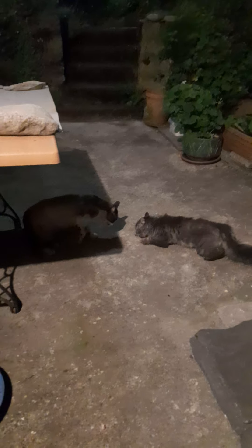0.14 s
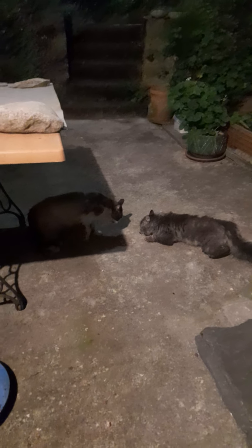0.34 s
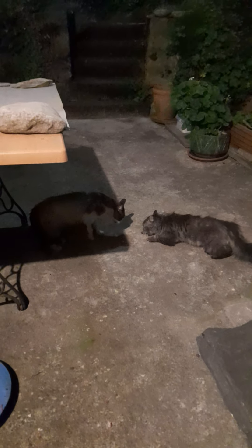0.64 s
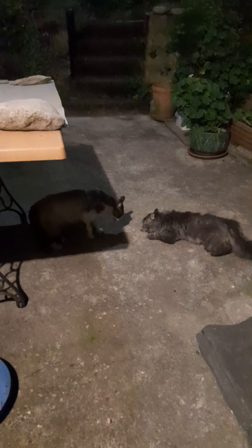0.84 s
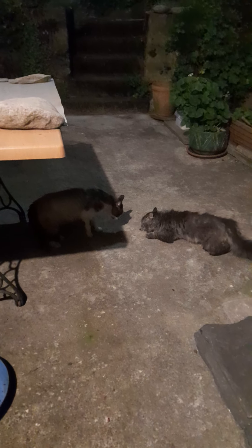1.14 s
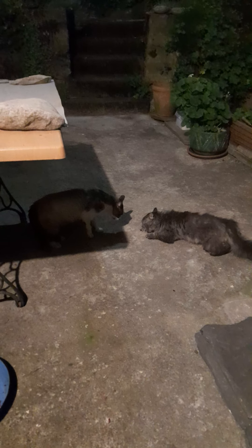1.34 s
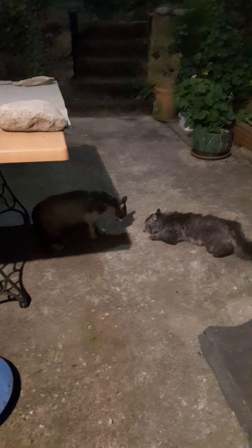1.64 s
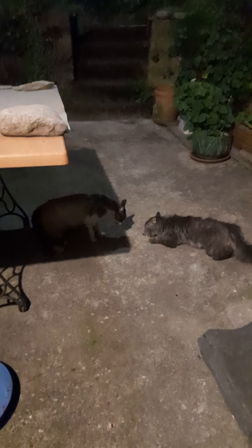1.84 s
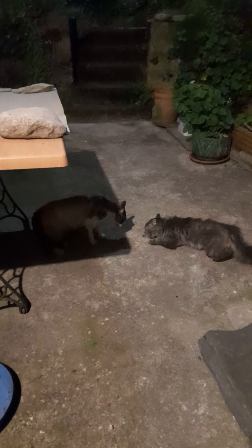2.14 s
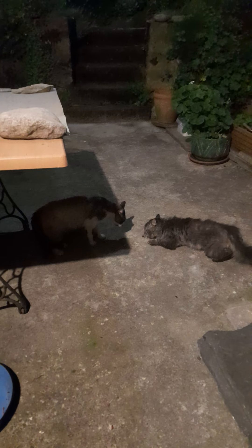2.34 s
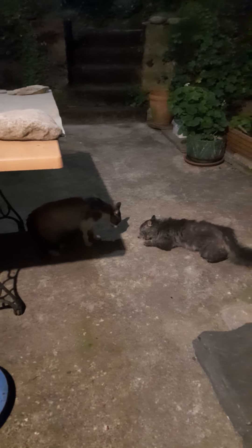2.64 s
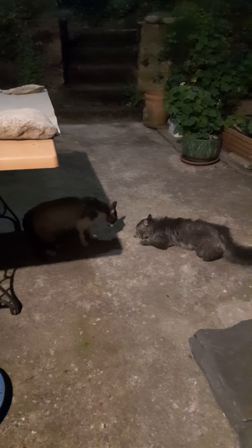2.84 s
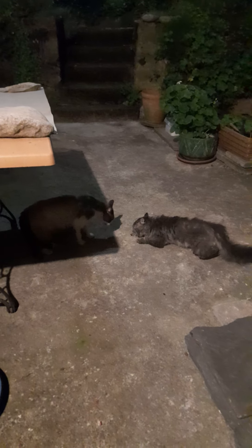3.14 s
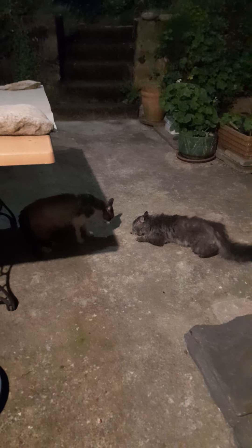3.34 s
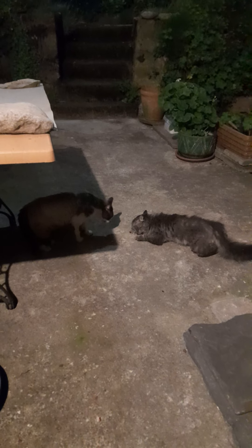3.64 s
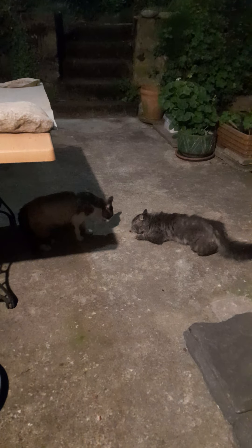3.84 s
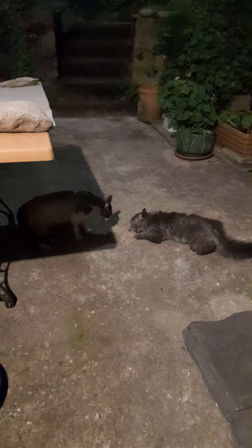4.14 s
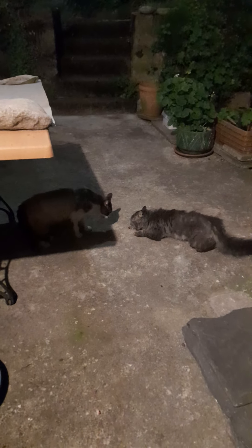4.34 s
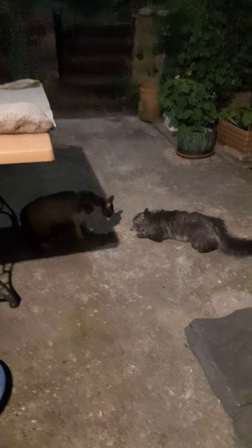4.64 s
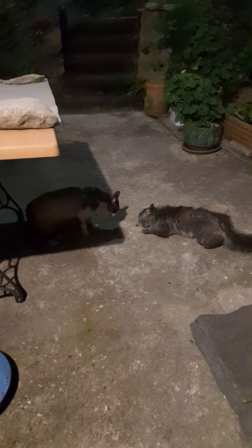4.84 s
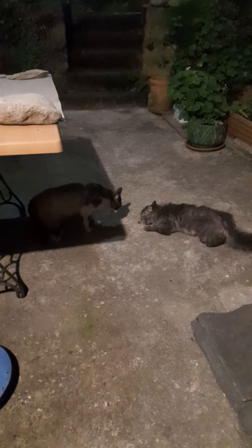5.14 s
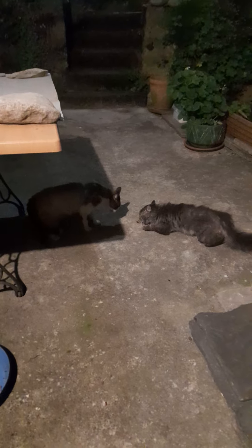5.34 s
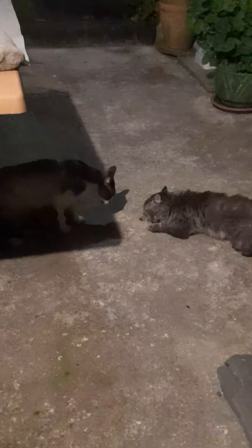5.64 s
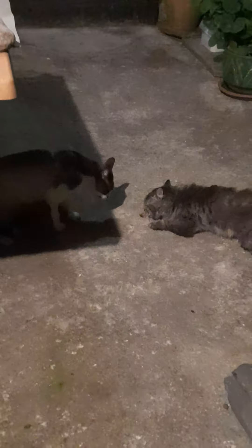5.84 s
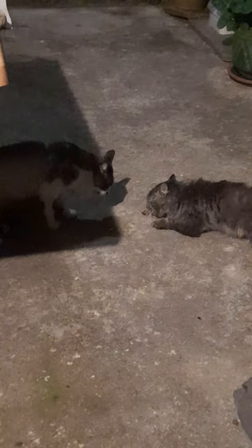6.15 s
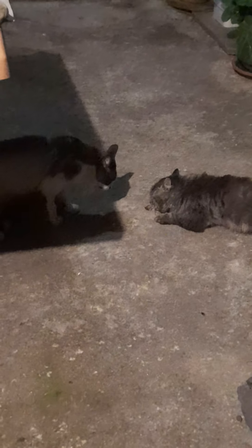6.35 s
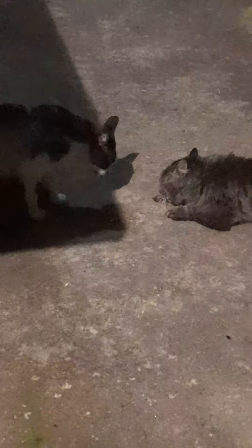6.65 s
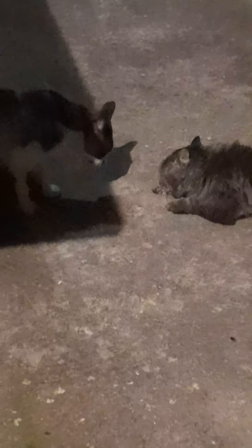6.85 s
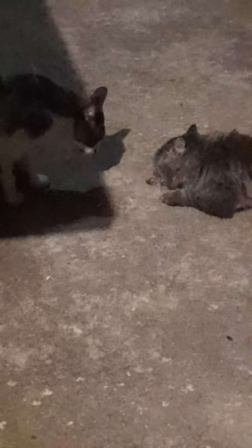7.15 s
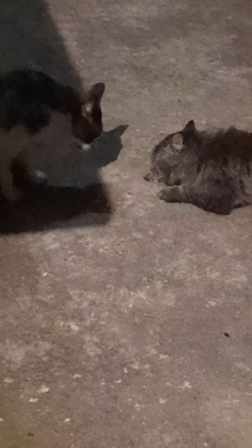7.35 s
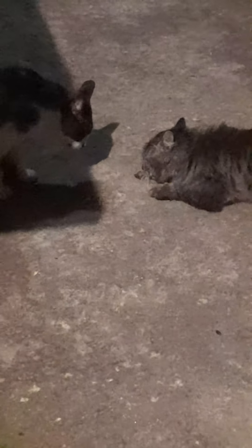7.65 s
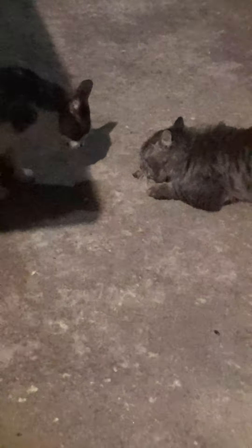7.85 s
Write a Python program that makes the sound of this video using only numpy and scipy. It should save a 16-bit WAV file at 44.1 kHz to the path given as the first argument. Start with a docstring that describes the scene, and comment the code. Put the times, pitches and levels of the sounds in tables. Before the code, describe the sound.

Two long cat yowls come almost back to back, each swelling from a tight whine to a wide-open wail and easing down with small voice catches and rasp. Another cat hums a low, falling moan under the second. A handheld stereo microphone outdoors picks up short reflections from concrete and walls, a low hush of air with slight hiss, and a soft dull rumble late on.

```python
"""Two long wavering yowls open into a wail and turn raspy, while a lower, softer moan runs beneath the second.
Two cats face each other at night in a small walled yard, over quiet air, hiss and a brief handling rumble.
The yowls are stacks of gliding harmonics, shaped by a throat that opens with the jaw, plus air and haze noise.
The moan is a short stack of harmonics through a closed mouth; walls and concrete throw the voices back."""
import sys
import numpy as np
from scipy import signal
from scipy.fft import rfft, irfft, next_fast_len
from scipy.io import wavfile
from scipy.ndimage import uniform_filter1d

SR = 44100
rng = np.random.default_rng(int(sys.argv[2]) if len(sys.argv) > 2 else 0)


def wav_out(sig):
    """Save sig, one row per channel (or a flat mono array), as 16-bit PCM at SR to the path in sys.argv[1]."""
    wavfile.write(sys.argv[1], SR, np.round(np.clip(np.atleast_2d(sig).T, -1, 1) * 32767).astype(np.int16))


N = 353139
TIME = np.arange(N) / SR


def gain_of(db):
    """Decibels to amplitude."""
    return 10 ** (np.asarray(db) / 20)


def evened(x):
    """Scales to an rms of one."""
    return x / np.sqrt(np.mean(x ** 2) + 1e-20)


def read(points, hz):
    """Reads a spectrum on a logarithmic frequency axis."""
    f, value = np.transpose(points)
    return np.interp(np.log(hz + 1), np.log(f + 1), value)


def follow(rows, x):
    """Reads every further column of a curve table at the positions x of its first column."""
    position, *columns = np.transpose(rows)
    return [np.interp(x, position, column) for column in columns]


def gate(t, start, end, fade):
    """One between start and end, with soft edges inside them."""
    inside = np.minimum(t - start, end - t)
    return np.sin(np.pi / 2 * np.clip(inside / fade, 0, 1)) ** 2


def coloured(x, points):
    """Filters a sound in the frequency domain to follow a spectrum in dB."""
    length = x.shape[-1]
    size = next_fast_len(length)
    gain = gain_of(read(points, np.fft.rfftfreq(size, 1 / SR)))
    return irfft(rfft(x, size) * gain, size)[..., :length]


def waver(size, hz):
    """Random unsteadiness with an rms of one, mostly slower than hz."""
    lowpass = signal.butter(2, hz, fs=SR, output="sos")
    return evened(signal.sosfilt(lowpass, rng.standard_normal(size)))


def night():
    """Still air and microphone hiss: steady coloured noise, partly shared by both microphones."""
    # tone of the background: f/Hz, relative density/dB
    night_tone = [(25, -20), (60, -7), (300, -3.5), (700, -5.5), (1500, -20.5), (3000, -24.5),
                  (9800, -36.5), (12500, -22), (16000, -25.5)]
    air = rng.standard_normal((2, N))
    shared_air = air + .12 * air[::-1]
    return gain_of(-68.5) * evened(coloured(shared_air, night_tone))


def handling():
    """A soft low rumble of handling: dark noise that swells in and out unsteadily."""
    # tone of the rumble: f/Hz, relative density/dB
    rumble_tone = [(30, -19), (140, 1.5), (300, -4), (2000, -55)]
    swell = gate(TIME, 5.85, 7.3, fade=0.46) * gain_of(3.9 * waver(N, hz=8))
    rumble = evened(coloured(rng.standard_normal(N), rumble_tone))
    return gain_of(-71.0) * swell * rumble


def yard(x, t60, first_echo, late_db, late_t60):
    """Dense reflections off the near walls die quickly; a faint tail returns from farther away."""
    # tone of the echo: f/Hz, level against the direct sound/dB
    echo_tone = [(400, -18), (1000, -18), (2000, -12), (6000, -8)]
    t = TIME[:SR // 2]
    echoes_per_s = 2000
    polarity = rng.choice([-1., 1.], (2, len(t)))
    taps = polarity * (rng.random((2, len(t))) < echoes_per_s / SR)
    taps = taps + .5 * taps[::-1]  # both microphones hear much the same walls
    near = gain_of(-60 * t / t60)
    far = gain_of(late_db - 60 * t / late_t60)
    taps *= (t > first_echo) * (near + far)
    taps /= np.linalg.norm(taps, axis=1, keepdims=True)
    return signal.fftconvolve(x, coloured(taps, echo_tone), axes=1)[:, :N]


def fold_phase(hz, drift, jitter):
    """Phase of vocal folds whose tension trembles slowly and whose cycles differ a little."""
    unsteady = 1 + drift * waver(len(hz), hz=25.0) + jitter * waver(len(hz), hz=222)
    return 2 * np.pi * np.cumsum(hz * unsteady) / SR


def moan():
    """The second cat hums through a closed mouth, which leaves only eight weighted harmonics."""
    # glide of the moan: t/s, pitch f/Hz, level ahead of the throat/dB
    glide = [(4.211, 409.6, -48), (4.39, 353.6, -63.5), (4.7, 303.3, -53), (4.87, 264.4, -50.5),
             (5.22, 238, -56), (5.501, 257.6, -53.5), (6.0, 267.4, -52.5), (6.349, 248.5, -57),
             (6.7, 228, -61.5), (6.79, 211.8, -53.5), (6.87, 191, -55.5), (7.11, 167.7, -60.5)]
    # throat with the mouth closed: f/Hz, gain/dB
    closed_throat = [(175, -4), (243, -1), (268, -19), (350, 0.5), (520, 1), (685, -1.5), (770, -16.5),
                     (1030, -18.5), (1250, -28.5), (2000, -44)]
    start, end = glide[0][0], glide[-1][0]
    sounding = (TIME >= start) & (TIME <= end)
    t = TIME[sounding]
    hz, level_db = follow(glide, t)
    phase = fold_phase(hz, drift=.008, jitter=.007)
    stack = np.zeros(len(t))
    for k in range(1, 9):
        height_db = read(closed_throat, k * hz) + 2.2 * waver(len(t), hz=9)
        stack += gain_of(height_db) * np.cos(k * phase)
    out = np.zeros(N)
    out[sounding] = np.sqrt(2) * gain_of(level_db) * stack * gate(t, start, end, fade=0.03)
    return out


def rasp(t, phase, rows, count, looseness):
    """Early and late cycles alternate loosely in groups of count, putting lines between the harmonics."""
    depth = sum(depth * gate(t, start, end, fade=0.077) for start, end, depth in rows)
    slip = looseness * waver(len(t), hz=71.5)
    return depth * (1 + .35 * waver(len(t), hz=22)) * np.sin(phase / count + slip)


def catches(t):
    """Catches in the voice: the pitch flicks up (Hz) and the level briefly shifts, mostly down (dB)."""
    # each catch: t/s, pitch flick/Hz, dip/dB
    catch_rows = [(0.488, 12, 0.5), (0.697, 7.9, 3.5), (1.569, 10, -1.5), (1.963, 26, 7.5), (2.122, 27, 3),
                  (2.632, 19.5, 1.5), (2.756, 21.5, 6), (7.189, 12, 2.5), (7.336, 18.4, 2),
                  (7.431, 16, 1.5), (7.59, 11, 3), (7.681, 7.5, 2.5)]
    flick_s, dip_s = .014, 0.016  # half widths
    flick = sum(hz * np.exp(-((t - s) / flick_s) ** 2) for s, hz, _ in catch_rows)
    dip = sum(db * np.exp(-((t - s) / dip_s) ** 2) for s, _, db in catch_rows)
    return flick, dip


def register_levels(effort_db, overtones_db, treble_db):
    """Effort lifts every register, the fundamental least; the upper two take their own offsets as well."""
    fundamental = -43.5 + 0.3 * effort_db
    octave = -36 + 1.0 * effort_db
    overtones = -52.5 + 0.97 * effort_db + overtones_db
    treble = -72 + 1.0 * effort_db + treble_db
    return np.array([fundamental, octave, overtones, treble])


def fading(hz, depth_db):
    """As a partial glides, wall reflections add to it and cancel it in turn, differently at each microphone."""
    grid = np.arange(300, 650, 7)  # fundamental, Hz
    shared, *own = rng.standard_normal((3, len(grid)))
    return np.array([np.interp(hz, grid, evened(gain_of(depth_db * (shared + side)))) for side in own])


def standing_waves(hz):
    """Reflections swell and cancel a low partial as it glides, differently at each microphone."""
    # standing waves of the yard, in any order: f/Hz, left gain/dB, right gain/dB
    wave_rows = [(340, -0.5, -5), (438, 2.5, 4), (458, -9.5, -1.5), (461.8, 0, -2), (491.5, -3.5, -11),
                 (524.4, 4, 3.5), (570, -8, -6), (611, -14.5, -15.5), (800, -8.5, -0.5), (785, -7, -5),
                 (854, -2, 1.5), (914, 0.5, -1), (922, 3.5, -2), (975, -5, 0.5), (1001, 2.5, -1),
                 (1018, 3.5, -6), (1049, 3, 7), (1118, 2, 4.5), (1086, -9, 3.5), (1166, -3.5, -12),
                 (1207, -15, -32)]
    gain = gain_of(follow(sorted(wave_rows), hz))
    return uniform_filter1d(gain, size=500, axis=1)  # smoothed over about 11 ms


def air_and_haze(effort_db, treble_db, jaw):
    """Air hisses past the vocal folds, more with an open jaw; a low, dull haze of noise follows the effort."""
    # rushing air: f/Hz, relative level/dB
    air_tone = [(1500, -20), (4200, 1), (5500, -8), (8200, -3), (10000, -8.5), (16000, -17.5)]
    # haze of noise around the voice: f/Hz, relative level/dB
    haze_tone = [(100, -16.5), (400, -6.5), (900, -7), (1400, -8), (2150, 2.5), (2450, -14), (3000, -35)]
    air_db = -80.5 + .35 * (effort_db + treble_db) + 3.2 * jaw
    haze_db = -72 + .5 * effort_db
    air = gain_of(air_db) * evened(coloured(rng.standard_normal((2, len(jaw))), air_tone))
    haze = gain_of(haze_db) * evened(coloured(rng.standard_normal(len(jaw)), haze_tone))
    return air + haze


def yowl(pitch, effort, wail, gape_db):
    """A stack of harmonics glides through a throat that opens with the jaw."""
    # jaw: t/s, opening (0-1)
    jaw_rows = [(.55, 0.24), (.8, 0.76), (1.08, 1), (1.36, 0), (4.3, 0.22), (4.7, 1), (5.2, 1), (5.7, 0.18),
                (6, 0.03)]
    # throat with the mouth nearly shut, ahead of the jaw's weighting: f/Hz, relative level/dB
    shut = [(1100, 15), (1330, 4.5), (1540, -6.5), (1700, 3), (1900, 0.5), (2080, 2.5), (2270, -0.5),
            (2470, -8), (2600, -17.5), (2800, -16.5), (3400, -29.5), (3800, -18), (4250, -12.5),
            (4650, -27), (5600, -31), (7200, -36), (8100, -27), (10000, -49)]
    # raspy stretches in groups of two cycles: start t/s, end t/s, depth ahead of the harmonic's weight/rad
    halved_rows = [(3.18, 4.1, .014), (3.58, 4.08, .032)]
    # raspy stretches in groups of three cycles: start t/s, end t/s, depth ahead of the harmonic's weight/rad
    tripled_rows = [(4.6, 4.84, .014), (7.03, 7.31, .062), (7.41, 7.58, .035), (7.72, 7.94, .035)]
    # lead of the left microphone over the right, through the yard's reflections: f/Hz, phase/rad
    lead_rows = [(500, 0.15), (950, 0.5), (1000, 1.6), (1060, 4.3), (1135, 1.3), (1350, 1), (1700, 0.87),
                 (1820, -2.2), (2100, 0.5), (2600, 1.4)]
    # slow random tremble of each partial, one entry per register: rms level/dB
    trembles_db = [.3, .5, 1.3, 1.499]
    start, end = effort[0][0], effort[-1][0]
    sounding = (TIME >= start) & (TIME <= end)
    t = TIME[sounding]
    flick_hz, dip_db = catches(t)
    hz = follow(pitch, t)[0] + flick_hz
    jaw = np.clip(follow(jaw_rows, t)[0], 0, 1)
    effort_db, overtones_db, treble_db = follow(effort, t)
    levels_db = register_levels(effort_db, overtones_db + gape_db * jaw, treble_db) - dip_db
    phase = fold_phase(hz, drift=.0035, jitter=.003)
    halved = rasp(t, phase, halved_rows, count=2, looseness=.7)
    tripled = rasp(t, phase, tripled_rows, count=3, looseness=.4)
    # the larynx rises with pitch and lifts the resonances of the top register
    shut_lift, open_lift = (hz / 465) ** .4, (hz / hz.max()) ** .55
    # harmonics of the fundamental, octave, overtone and treble registers
    registers = [[1], [2], range(3, 7), range(7, 27)]
    # upward through the registers, more airy flutter and deeper fading among the reflections
    turbulence_db = [-46, -42, -32, -16]  # with the jaw shut
    fading_db = [.4, .7, 2, 3.5]
    out = np.zeros((2, N))
    settings = zip(registers, levels_db, turbulence_db, fading_db, trembles_db)
    for orders, level_db, airy_db, fade_db, tremble_db in settings:
        shut_hz, open_hz = hz, hz
        if orders is registers[-1]:
            shut_hz, open_hz = hz / shut_lift, hz / open_lift
        throat = np.array([
            gain_of((1.5 - jaw) * read(shut, k * shut_hz) + jaw * read(wail, k * open_hz))
            for k in orders])
        # the throat shares out the register's level among its harmonics
        throat *= gain_of(level_db) / np.linalg.norm(throat, axis=0)
        for k, height in zip(orders, throat):
            halved_weight = 4 * (k > 1)
            tripled_weight = min(k, 4) ** 2 if k < 6 else 8
            turn = k * phase + halved_weight * halved + tripled_weight * tripled
            lead = read(lead_rows, k * hz) / 2  # half of it to each side
            sides = np.sqrt(2) * fading(hz, fade_db)
            if k <= 2:
                sides = sides * standing_waves(k * hz)
            flutter = 1 + gain_of(airy_db - 2.0 * jaw) * waver(len(t), hz=297)  # a full wail is purer
            tremble = gain_of(tremble_db * waver(len(t), hz=14))
            out[:, sounding] += sides * height * flutter * tremble * np.cos([turn + lead, turn - lead])
    # a faint undertone a fixed step below the fundamental recedes as the mouth opens
    step_hz = 188
    undertone_gain = gain_of(levels_db[0] - 27 - 8.8 * jaw)
    out[:, sounding] += undertone_gain * np.cos(phase - 2 * np.pi * step_hz * t)
    out[:, sounding] += air_and_haze(effort_db, treble_db, jaw)
    return out * gate(TIME, start, end, fade=.009)


def scene():
    """Both cats, their echo off the yard, the night and the handling rumble."""
    # glide of each yowl: t/s, pitch f/Hz
    first_pitch = [(0.01, 525), (0.151, 475), (0.47, 504.6), (0.636, 545), (0.749, 597.9), (1.026, 604.3),
                   (1.18, 596), (1.298, 546), (1.38, 569), (1.73, 460.3), (2.1, 479.3), (2.382, 528.7),
                   (2.6, 494), (2.9, 460.8), (3.0, 468.5), (3.4, 427.5), (3.95, 408), (4.21, 359.4)]
    second_pitch = [(4.66, 317.4), (4.701, 419), (4.801, 529), (4.9, 556.3), (5.15, 576.6), (5.476, 544.3),
                    (5.68, 458), (5.758, 489.4), (6.0, 424.7), (6.202, 418.4), (6.592, 446), (7.0, 469),
                    (8.0, 469.3)]
    # push behind each yowl and its colour: t/s, effort/dB, extra overtones/dB, extra treble/dB
    first_effort = [(0.0, 1.5, -11, 9.5), (0.11, -2, -10, 10), (0.16, 3.5, -4, 6.5), (0.6, 9.5, -2, -0.5),
                    (0.9, 10.5, 2.5, 5.5), (1.27, 12, -7, 1), (1.4, 0.5, 1, 7.5), (1.62, -6, 4.5, 10.5),
                    (1.76, 4, 0.5, 12.5), (2.2, 4.5, 0, -3), (2.38, 5, -0.5, 7), (2.52, 4.5, -5.5, -4),
                    (2.86, 4.5, -4.5, -1.5), (2.998, -7, 3.5, -8), (3.4, -2, 3, -13.5),
                    (3.95, -10.5, -0.5, -13), (4.234, -13, 2, -22)]
    second_effort = [(4.655, -5.5, 6.5, -2), (4.71, 7, -1.5, 2), (4.95, 13.5, 2, -3), (5.22, 5, -2, 9),
                     (5.55, 1.5, -2.5, 6.5), (5.68, 8, -10, 3), (5.801, -9, 4, 13), (6.05, 3.5, -1, -9.5),
                     (6.45, 3.5, 3, -3.5), (6.68, -3.5, 6, -9.5), (7.2, -2, -3.5, -8),
                     (7.87, -8, -1.5, -14), (7.942, -23.5, 6.5, -13), (8.02, -14, -8, -8)]
    # throat colour that the opening jaw blends in for each wail: f/Hz, relative level/dB
    first_wail = [(1400, -11), (1800, -2), (2420, -4.5), (2700, -11.5), (3050, -5.5), (3550, -41.5),
                  (4200, -39), (4850, -43), (5420, -22.5), (6400, -34), (7200, -33.5), (7800, -43),
                  (8450, -39), (9500, -72.5)]
    second_wail = [(1400, 4.5), (1720, -2), (2280, -2.5), (2620, -26), (2900, -21), (3450, -22.5),
                   (4080, -40), (4630, -26.5), (5200, -29.5), (5750, -45.5), (6400, -32.5), (7000, -30.5),
                   (7550, -22), (8050, -25.5), (9000, -43), (13000, -40), (16000, -54)]
    # gape_db: how much a fully open jaw lifts the overtones
    first = yowl(first_pitch, first_effort, first_wail, gape_db=16.5)
    second = yowl(second_pitch, second_effort, second_wail, gape_db=9)
    cats = first + second + moan()
    echo = yard(cats, t60=.17, first_echo=.005, late_db=-22, late_t60=.4)  # times in s
    return cats + echo + night() + handling()


def record(dry):
    """Band limit: a steep linear-phase low-pass takes away the very top of the treble."""
    edge_hz = 15750
    lowpass = signal.firwin(511, edge_hz, window=("kaiser", 9), fs=SR)
    return signal.oaconvolve(dry, lowpass[None], "same")


dry = scene()
out = record(dry)
wav_out(out)
```